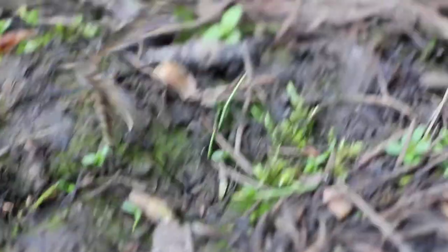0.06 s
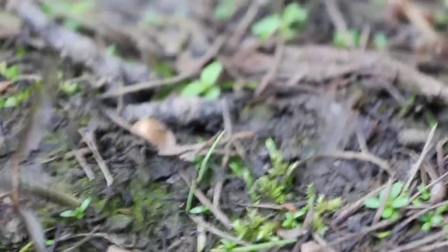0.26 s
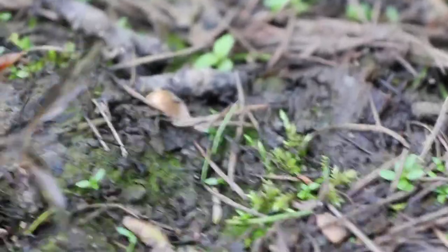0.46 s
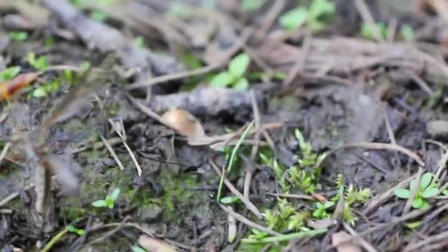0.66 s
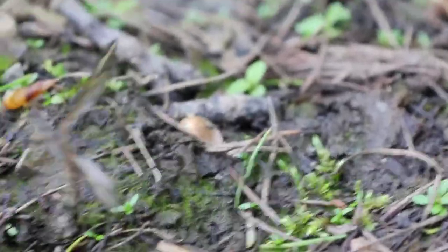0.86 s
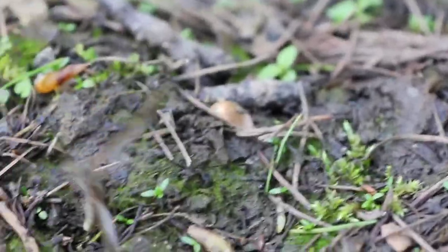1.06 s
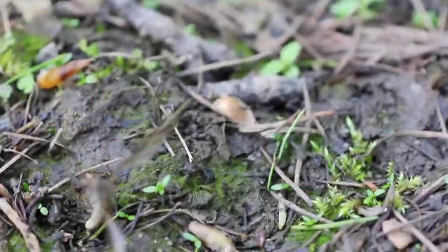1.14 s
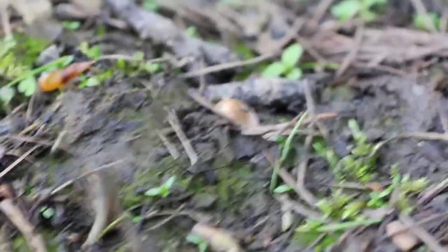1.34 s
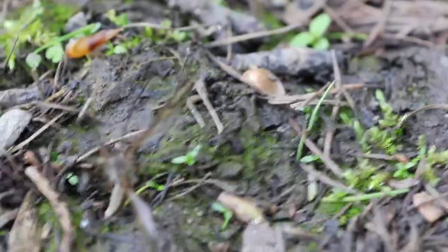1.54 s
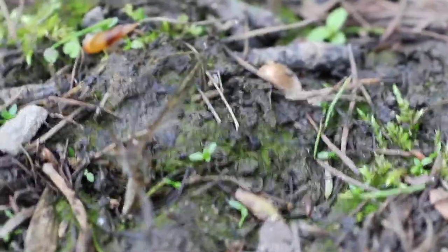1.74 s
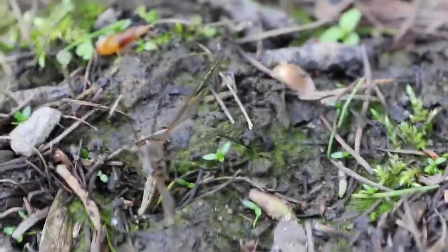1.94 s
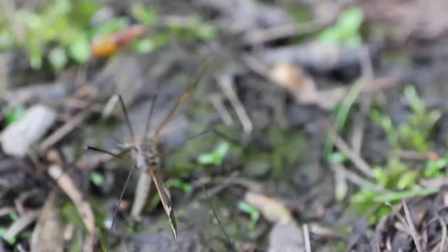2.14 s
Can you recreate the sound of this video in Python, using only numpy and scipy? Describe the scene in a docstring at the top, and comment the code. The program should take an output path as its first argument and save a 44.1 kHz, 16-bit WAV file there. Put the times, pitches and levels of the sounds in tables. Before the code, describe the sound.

Camera handling noise, right at the microphone: sharp plastic clicks and finger scuffs, then low bumps and a short brushing hiss. Two light taps come near the end. Faint distant birds and light wind continue outdoors throughout.

```python
"""Light wind and small birds far off among trees sound throughout, in mono. In the first second a
hand shifts its grip on a camera held over damp soil: the plastic casing clicks, and skin creeps and
scuffs across it. The fingers then bump the body, the palm shudders, and something brushes past with
a short soft hiss. Faint creeping returns, and two light taps ring the hollow grip near the end."""
import sys
import numpy as np
from scipy import signal
from scipy.fft import rfft, irfft, next_fast_len
from scipy.io import wavfile
from scipy.ndimage import map_coordinates

SR = 44100
rng = np.random.default_rng(int(sys.argv[2]) if len(sys.argv) > 2 else 0)


def persist_wave(psi):
    """Save psi, clipped to +-1, as 16-bit WAV."""
    counts = np.round(np.clip(psi, -1, 1) * 32767).astype(np.int16)
    wavfile.write(sys.argv[1], SR, np.atleast_2d(counts).T)


N = 97020

# Spectra of the noises. Each row: frequency in Hz, relative level in dB.
WIND_SPECTRUM = [(15, -41), (25, -8), (63, -4.5), (130, -2.5), (229, 1), (363, -5.5), (659, -5), (1020, -7),
                 (1940, -14.5), (2760, -16), (4400, -17.5), (6000, -19), (7920, -25.5), (11000, -28),
                 (14000, -29.5), (16000, -34)]
CREEP_SPECTRUM = [(1000, -6), (3000, 1), (7000, -1.5), (12000, -1), (16000, -6)]
BRUSH_SPECTRUM = [(200, -22), (700, -11.5), (1600, 0.5), (3000, 1.5), (5500, 0.5), (8000, -4),
                  (11000, -2.5), (14000, -8), (16000, -13)]
DRAG_SPECTRUM = [(20, -9), (45, -4), (90, 7), (140, -17), (250, -16), (600, -46), (2000, -80)]
SCUFF_SPECTRUM = [(300, 7), (3000, -3.5), (6000, 0), (9000, -5.5), (14000, -2), (17000, -4)]
# Strength of the wind. Each row: time in seconds, level in dB.
WIND_LEVELS = [(0, -45.5), (.6, -45.5), (1.3, -46), (2.2, -46.5)]
# Bird calls. Each row: start and length in seconds, first pitch, last pitch and trill depth in Hz,
# level in dB.
WHISTLES = [(-.12, 0.28, 5700, 5465, 770, -52), (0.465, 0.17, 3786, 3693, 36, -60),
            (0.522, .2, 7800, 7830, 100, -65.5), (0.977, 0.15, 3910, 3903, 15, -63),
            (1.012, 0.12, 5170, 4800, 41, -59.5), (1.082, .17, 7620, 7400, 54, -63.5),
            (1.2, 0.127, 4306, 4257, 9.9, -58.5), (1.351, 0.168, 4274, 4315, 19, -61),
            (1.31, 0.12, 5200, 4960, 114, -56), (1.476, 0.16, 6100, 6380, 360, -59.5),
            (1.685, 0.12, 4550, 4236, 87, -56), (1.782, 0.22, 4390, 4420, 150, -60),
            (1.905, 0.082, 6540, 6950, 310, -58.5), (1.982, 0.16, 7080, 7200, 200, -62.5),
            (1.927, 0.087, 5604, 5520, 36, -61), (2.126, 0.14, 4570, 4590, 286, -58)]
# Spells of sliding contact. Each row: start and end in seconds, level in dB.
SKIN_CREEPS = [(.14, .41, -51), (.41, .58, -51), (.58, .74, -54.5), (1.22, 1.38, -56), (1.43, 1.57, -58)]
BRUSH_STROKES = [(.13, 0.75, -56.5), (.728, 0.86, -39.5), (.84, 1.009, -38.5), (1.0, 1.3, -57.5)]
PALM_DRAGS = [(.18, .26, -53), (.345, .46, -53), (.65, .775, -36.5), (.817, .865, -37)]
# Slips of a finger. Each row: peak time in seconds, level in dB, time constant in seconds.
FINGER_SCUFFS = [(.516, -21, 0.00073), (0.569, -28.5, 0.0025), (0.617, -40, 0.0017)]
# Taps on the grip. Each row: start in seconds, level in dB, treble tilt in dB per octave.
GRIP_KNOCKS = [(.003, -36, 15), (0.3555, -30, 5), (.618, -40, 9), (1.7451, -33, -4), (1.905, -24.5, 2.5)]
# Soft blows on the body. Each row: peak time in seconds, level in dB, strongest frequency in Hz.
FINGER_BUMPS = [(0.328, -29.5, 231), (.356, -35.5, 90), (0.5195, -30.5, 139), (0.566, -35, 119),
                (0.671, -23, 99), (0.683, -23, 89), (0.708, -29, 89), (0.725, -24, 90),
                (0.7326, -28.5, 420), (.736, -17.5, 159), (0.7591, -14, 110), (0.829, -30.5, 98),
                (0.8578, -19, 188), (0.893, -30.5, 132)]
# Normal modes. Each row: frequency in Hz, relative level in dB, time to decay by 60 dB in seconds.
GRIP_MODES = [(387, 1, 0.025), (565, 0.5, 0.022), (1023, -2, 0.015), (1480, -8.5, .014)]
CASING_MODES = [(490, -25.5, 0.0052), (877, -19, 0.01), (1700, -20.5, 0.0043), (2770, -12.5, 0.012),
                (3800, -9, 0.0044), (4410, -11, 0.0039), (5280, -19.5, 0.0066), (8100, -18.5, 0.0056),
                (11400, -31, 0.0026), (14500, -42, 0.0014)]
# Snaps of plastic parts. Each row: start in seconds, level in dB, treble tilt in dB per octave,
# the part's own frequency in Hz, its relative level in dB.
CASING_CLICKS = [(.1635, -25, 3.5, 6300, -14), (0.2006, -32, 9.5, 3100, -6),
                 (.2136, -14.5, 2.5, 5620, -14.5), (.245, -26, 7, 2820, -8), (.258, -13.5, 1, 1850, -6.5),
                 (0.3266, -2, -0.7, 2525, -13), (.331, -25, -7.5, 2360, -7), (0.387, -18, 3, 2600, -10.5),
                 (.403, -27, 6, 6200, -19), (0.521, -10, .5, 3050, -12.5), (.5682, -27, -5, 3360, -3),
                 (.581, -24, -2, 1670, -10), (0.619, -34, 0, 1210, 1.5)]

TRILL_HZ, WHISTLE_RISE_S, BIRD_DIRECT_GAIN, WOODS_T60_S = 69.9, 0.026, 0.72, 0.74
CREEP_GRAIN_DB, CREEP_GRAINS_PER_S = 4.5, 570
CRACK_DB, CRACK_T60_S, RATTLE_DB, RATTLE_T60_S = -8, 0.0032, -41, 0.041
PART_T60_S, CLICK_RISE_S, KNOCK_RISE_S = 0.01, 0.00006, 0.00092
BENDING_DELAY_S = 0.000526  # travel time through the shell at 1 kHz
TILT_PAD_S = 0.01
LOW_CUT_HZ, TOP_HZ = 20, 16000


def amp(db):
    """Amplitude grows tenfold for every 20 dB."""
    return 10 ** (np.asarray(db) / 20)


def unit(x):
    """Normalisation brings the rms to 1."""
    return x / np.sqrt(np.mean(x ** 2) + 1e-20)


def filtered(x, response):
    """A linear filter multiplies the spectrum by its frequency response."""
    size = next_fast_len(len(x) + 8192)
    return irfft(rfft(x, size) * response(np.fft.rfftfreq(size, 1 / SR)), size)[:len(x)]


def tilted(sound, tilt_db, pivot_hz):
    """Spectral tilt: harder contact gives more treble. TILT_PAD_S of padding precedes the sound."""
    padded = np.pad(sound, (round(TILT_PAD_S * SR), 0))
    return filtered(padded, lambda hz: amp(tilt_db * np.log2((hz + 500) / (pivot_hz + 500))))


def noise(spectrum):
    """Filtering colours white noise; the result has rms 1."""
    knots_hz, db = np.transpose(spectrum)
    white = rng.standard_normal(N)
    return unit(filtered(white, lambda hz: amp(np.interp(np.log(hz + 1), np.log(knots_hz), db))))


def wobble(rate):
    """Interpolation joins random values, rate of them a second, into a smooth curve."""
    knots = rng.standard_normal(int(N * rate / SR) + 4)
    return map_coordinates(knots, [np.arange(N) * rate / SR])


def add(track, start, sound):
    """Superposition: a sound adds to the track from its start in seconds."""
    i = round(start * SR)
    part = sound[max(-i, 0):max(len(track) - i, 0)]
    track[max(i, 0):][:len(part)] += part


def ring(modes, t, scatter_db):
    """Free vibration is a sum of damped modes, excited a little differently by each blow."""
    return sum(amp(db + scatter_db * rng.normal() - 60 * t / t60) * np.sin(2 * np.pi * hz * t)
               for hz, db, t60 in modes)


def strokes(rows, rise_s, fall_s):
    """Incoherent strokes add in power, giving one amplitude envelope."""
    t, power = np.arange(N) / SR, np.zeros(N)
    for start, end, db in rows:
        rise = np.clip((t - start) / rise_s + .5, 0, 1)
        fall = np.clip((end - t) / fall_s + .5, 0, 1)
        power += (amp(db) * rise * fall) ** 2
    return np.sqrt(power)


def wind():
    """Light wind in the trees is broadband noise under slow amplitude modulation."""
    level_db = np.interp(np.arange(N) / SR, *np.transpose(WIND_LEVELS))
    return noise(WIND_SPECTRUM) * amp(level_db + 0.56 * wobble(rate=5.82))


def birds():
    """Frequency modulation trills each gliding whistle; reverberation from the trees dominates."""
    direct = np.zeros(N)
    for start, length, first_hz, last_hz, depth_hz, db in WHISTLES:
        progress = np.linspace(0, 1, int(length * SR))
        trill = np.sin(2 * np.pi * TRILL_HZ * length * progress) + .5 * wobble(rate=200)[:len(progress)]
        hz = first_hz + (last_hz - first_hz) * progress + depth_hz * trill
        envelope = np.minimum(progress * length / WHISTLE_RISE_S, 1) * np.sqrt(1 - progress)
        add(direct, start, amp(db) * unit(np.sin(2 * np.pi * np.cumsum(hz) / SR) * envelope))
    t = np.arange(SR) / SR
    tail = rng.standard_normal(SR) * amp(-60 * t / WOODS_T60_S)
    echo = signal.fftconvolve(direct, tail / np.linalg.norm(tail))[:N]
    return BIRD_DIRECT_GAIN * direct + echo


def creeping():
    """Stick-slip friction of skin on the casing makes a faint grainy fizz."""
    grains = unit(noise(CREEP_SPECTRUM) * amp(CREEP_GRAIN_DB * wobble(CREEP_GRAINS_PER_S)))
    return grains * strokes(SKIN_CREEPS, rise_s=0.075, fall_s=0.05)


def rubbing():
    """Sliding friction gives the palm's low shudder and the soft hiss of brushing."""
    shudder = noise(DRAG_SPECTRUM) * strokes(PALM_DRAGS, rise_s=0.022, fall_s=0.014)
    hiss = noise(BRUSH_SPECTRUM) * strokes(BRUSH_STROKES, rise_s=0.05, fall_s=0.1)
    return shudder + hiss


def scuffs():
    """Friction under a slipping finger gives a very short broadband rasp."""
    t = np.arange(N) / SR
    envelope = sum(amp(db) * np.exp(-np.abs(t - peak) / width) for peak, db, width in FINGER_SCUFFS)
    return noise(SCUFF_SPECTRUM) * envelope


def knocks():
    """Resonance: light taps excite the modes of the hollow grip."""
    out, t = np.zeros(N), np.arange(SR // 20) / SR
    for start, db, tilt_db in GRIP_KNOCKS:
        tap = ring(GRIP_MODES, t, scatter_db=1.5) * (1 - np.exp(-t / KNOCK_RISE_S))
        add(out, start - TILT_PAD_S, amp(db) * tilted(tap, tilt_db, pivot_hz=700))
    return out


def bumps():
    """A soft impact gives one low pressure pulse, with a rebound on either side and no ring."""
    out, t = np.zeros(N), np.arange(N) / SR
    for peak, db, hz in FINGER_BUMPS:
        offset_squared = (np.pi * hz * (t - peak)) ** 2
        out += amp(db) * (1 - 2 * offset_squared) * np.exp(-offset_squared)
    return out


def clicks():
    """Impulsive excitation: a plastic part snaps, rings with the casing and rattles faintly."""
    out, t = np.zeros(N), np.arange(SR // 20) / SR
    crack = amp(CRACK_DB - 60 * t / CRACK_T60_S)
    rattle = amp(RATTLE_DB - 60 * t / RATTLE_T60_S)
    for start, db, tilt_db, part_hz, part_db in CASING_CLICKS:
        burst = (crack + rattle) * rng.standard_normal(len(t))
        ringing = ring([*CASING_MODES, (part_hz, part_db, PART_T60_S)], t, scatter_db=2)
        snap = (ringing + burst) * (1 - np.exp(-t / CLICK_RISE_S))
        add(out, start - TILT_PAD_S, amp(db) * tilted(snap, tilt_db, pivot_hz=3500))
    # Dispersion: bending waves in the shell carry the treble sooner than the bass.
    return filtered(out, lambda hz: np.exp(-4j * np.pi * BENDING_DELAY_S * np.sqrt(1000 * hz)))


def scene():
    """The sources superpose and reach both channels alike."""
    mono = clicks() + scuffs() + bumps() + knocks() + rubbing() + creeping() + birds() + wind()
    return np.array([mono, mono])


def record(dry):
    """Band limiting weakens the deepest bass and removes everything above TOP_HZ."""
    high_passed = signal.sosfilt(signal.butter(1, LOW_CUT_HZ, "high", fs=SR, output="sos"), dry)
    return np.array([filtered(channel, lambda hz: hz < TOP_HZ) for channel in high_passed])


dry = scene()
out = record(dry)
persist_wave(out)
```